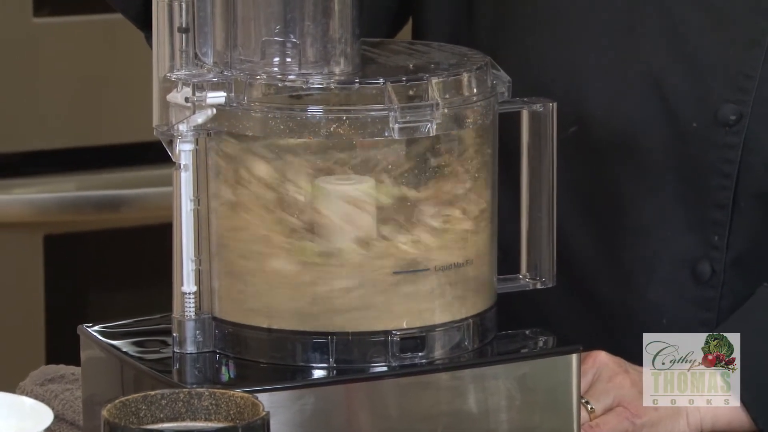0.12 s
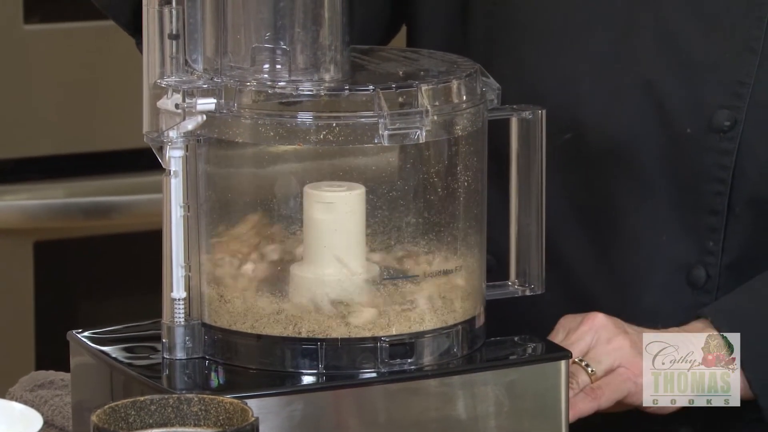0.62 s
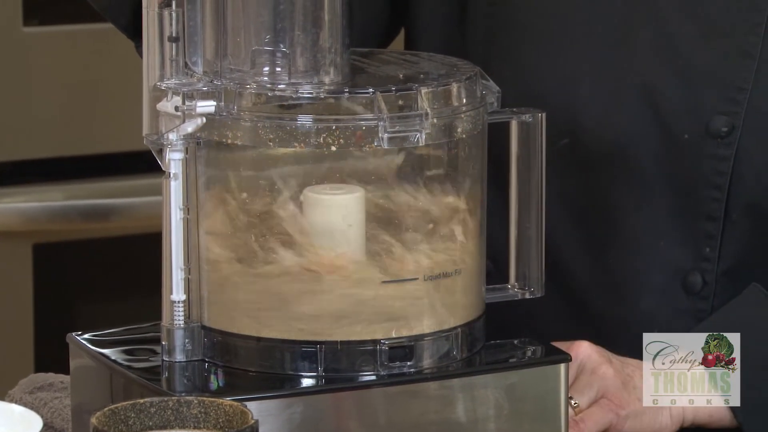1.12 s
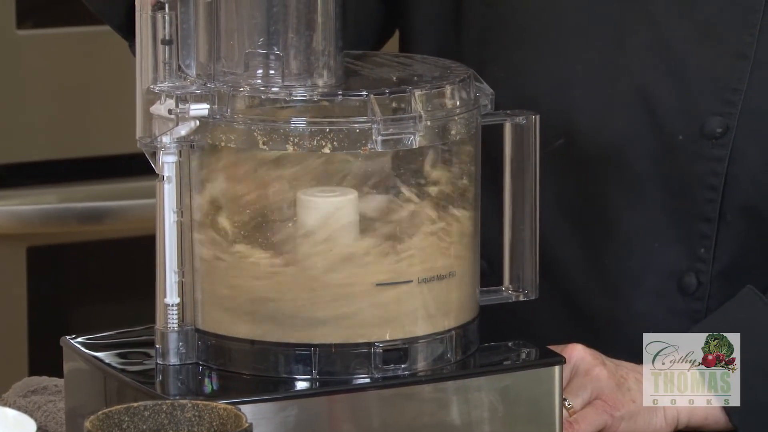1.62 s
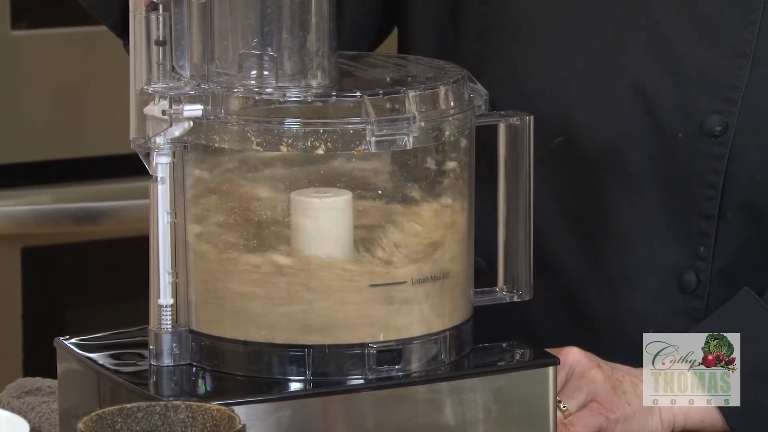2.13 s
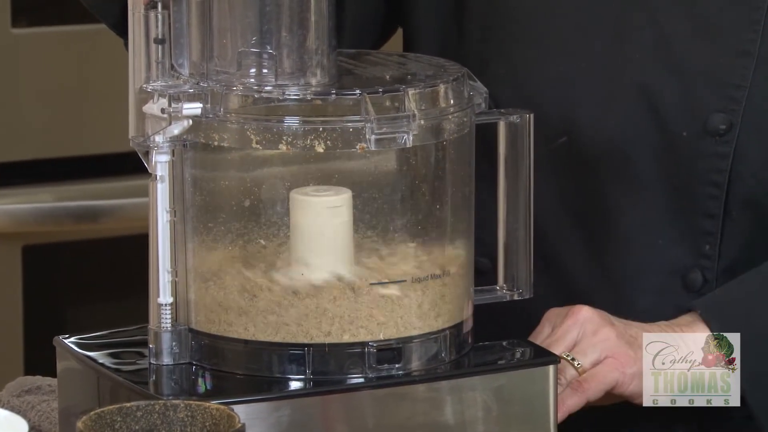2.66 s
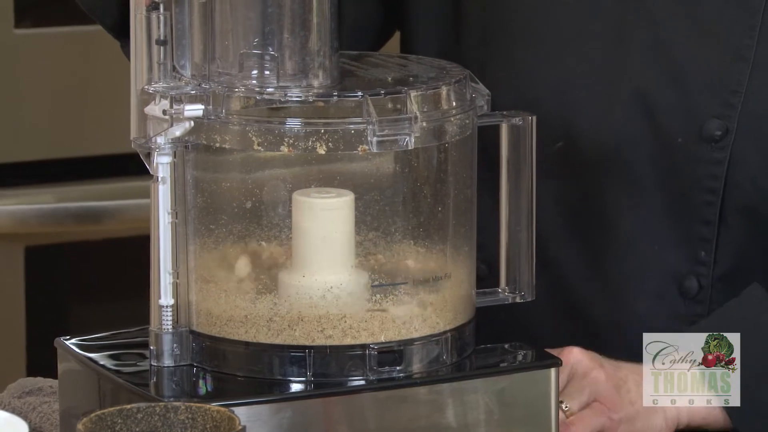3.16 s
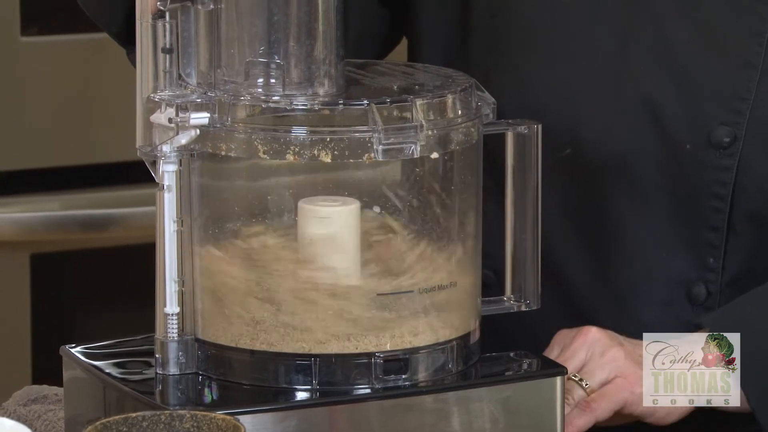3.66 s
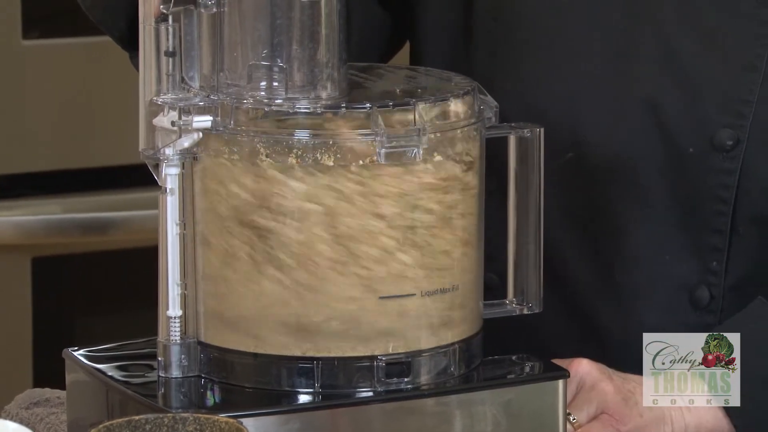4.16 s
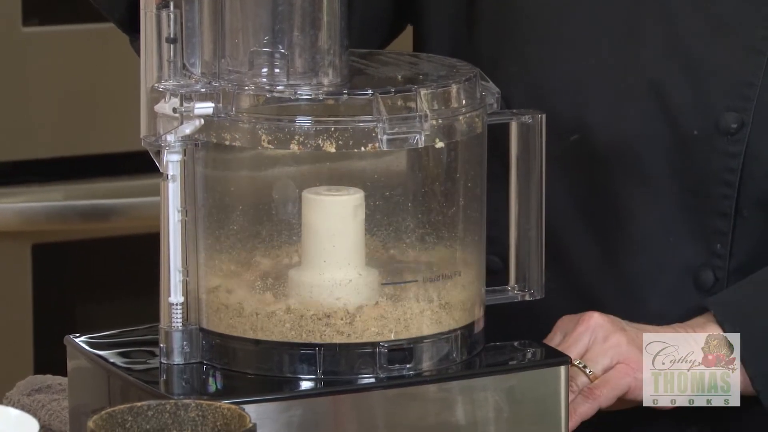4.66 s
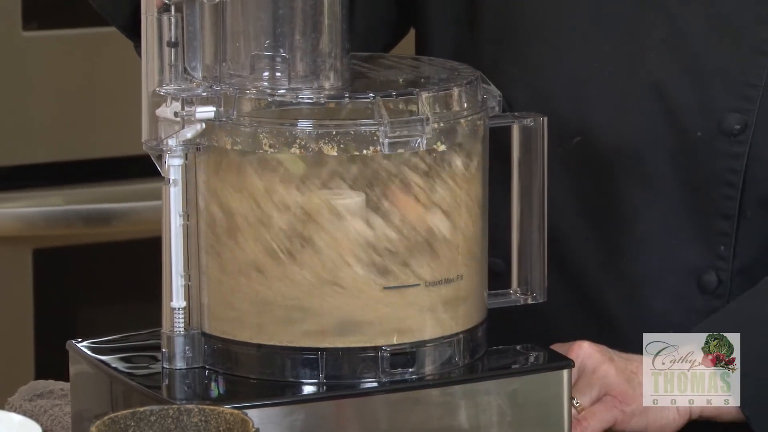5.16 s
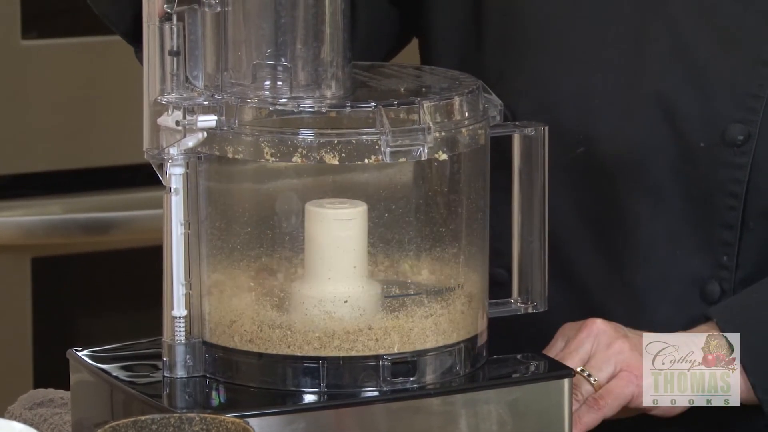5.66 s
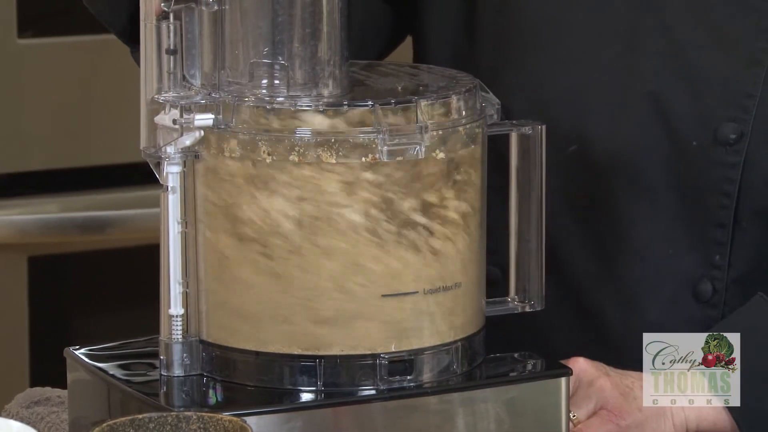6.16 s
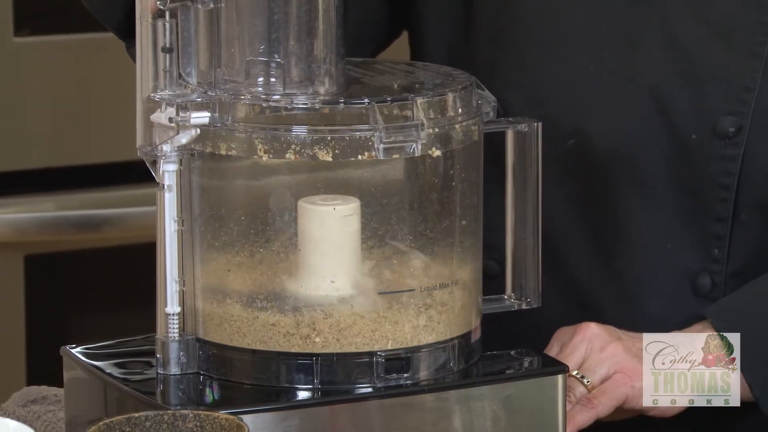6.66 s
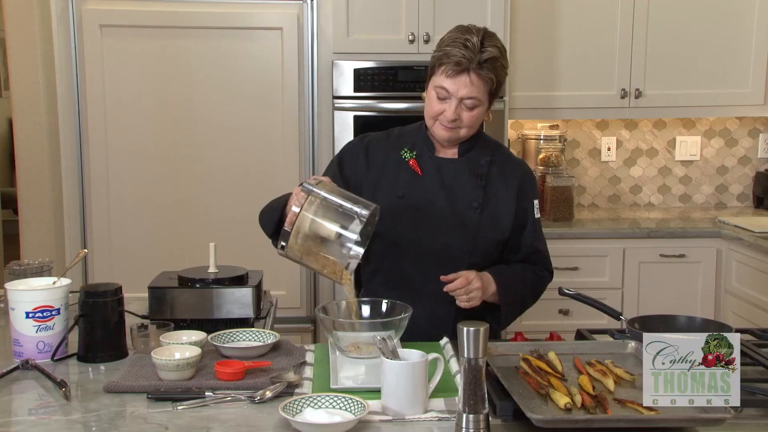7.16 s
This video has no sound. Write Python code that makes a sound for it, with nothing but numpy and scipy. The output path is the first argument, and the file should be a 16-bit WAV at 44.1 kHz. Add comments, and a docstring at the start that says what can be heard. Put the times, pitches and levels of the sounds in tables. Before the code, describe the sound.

Nuts clatter and crackle around a plastic processor bowl in one long and several short bursts, before being tipped into ringing glass.

```python
"""A small kitchen, one microphone. A food processor pulses six times: lever taps and contact snaps come
ahead of later pulses, then the blade flings nut pieces against the plastic bowl (a random hail of rings
and cracks) over an induction motor's hum (narrow noise), and each burst coasts down to a few last knocks.
At the end chopped nuts are tipped into a glass bowl that rings high (decaying, beating sines).
Quiet room air (coloured noise) lies under it all, and sparse echoes answer the bowls."""
import sys
import numpy as np
from scipy import signal
from scipy.fft import rfft, irfft, next_fast_len
from scipy.io import wavfile
from scipy.ndimage import uniform_filter1d

SR = 44100
rng = np.random.default_rng(int(sys.argv[2]) if len(sys.argv) > 2 else 0)


def gain_from_decibels(decibels):
    """Convert decibel values to linear amplitude factors."""
    exponent = np.asarray(decibels, float) / 20
    return 10 ** exponent


def wav_out(sig):
    """Save sig, one row per channel (or a flat mono array), as 16-bit PCM at SR to the path in sys.argv[1]."""
    wavfile.write(sys.argv[1], SR, np.round(np.clip(np.atleast_2d(sig).T, -1, 1) * 32767).astype(np.int16))


N = 321923
T = np.arange(N) / SR
BLOW_T = np.arange(2048) / SR  # time within one blow
SHAFT_HZ, PIECES_PER_S = 30.24, 5000  # the piece rate is for the full swirl
LOAD, HUM_LOAD, CRACKLE_LOAD = 2, 3, 4  # columns of the pulse table
# rise from contact to the kick: rattle_s, drumming_s, crackle_s, boom_s, hum_s
RISES_S = (.065, .056, .068, .03, .035)


def evened(x):
    """Scales to rms 1."""
    return x / np.sqrt(np.mean(x ** 2) + 1e-20)


def read(points, hz):
    """Reads a spectrum table on a log-frequency axis."""
    f, value = np.transpose(points)
    return np.interp(np.log(hz + 1), np.log(f + 1), value)


def coloured(x, points):
    """Filters the last axis by a spectrum table."""
    hz = np.fft.rfftfreq(x.shape[-1], 1 / SR)
    return irfft(rfft(x) * gain_from_decibels(read(points, hz)), x.shape[-1])


def add(mix, s, sound):
    """Lays a sound into the mix at a time."""
    part = mix[round(s * SR):][:len(sound)]
    part += sound[:len(part)]


def effort(layer, rise_s, column):
    """Level in dB of one layer: a kick throws the pile up, a lull while it hangs, full swirl, coast-down."""
    # pushes of the pulse lever: contact_s, release_s, load_db, hum_db, crackle_db,
    # coasting time as a share of the usual
    pulses = [(-.005, 0.396, -1, -8, -1, 1.11), (0.893, 2.494, 0, -4.5, 0.2, 0.94),
              (3.202, 3.584, 0.5, -3, 0, 1.14), (4.042, 4.395, 2, 2, 2, 0.89),
              (4.985, 5.368, 0.17, 1.5, 2.5, 0.92), (6.029, 6.451, 0.5, 2, 0.5, 0.94)]
    # the pile tumbles onto the blade (swell) or hangs on the wall (dip):
    # centre_s, half_length_s, change_db before the layer's share
    pile_surges = [(.001, 0.034, 10.5), (0.074, .02, 2), (0.213, .025, -0.5), (0.401, 0.0071, -5.5),
                   (0.621, 0.08, 5), (0.975, 0.013, 1), (1.116, 0.014, 3.5), (1.157, 0.015, 2.5),
                   (1.259, 0.023, -5.5), (1.294, .014, 0.5), (1.342, 0.022, -7.5), (1.464, .02, -3),
                   (1.631, 0.047, -5.5), (1.754, 0.055, -1.5), (2.106, 0.03, 2.5), (2.183, 0.037, -3.5),
                   (2.403, 0.014, 1.5), (2.499, 0.0059, 3), (4.033, 0.017, -11.5), (4.095, 0.031, -2),
                   (4.278, 0.019, 2), (4.675, 0.055, 3.5), (5.14, 0.058, 2.5), (5.243, 0.015, 1.5),
                   (5.712, 0.042, 5), (6.324, 0.024, 1.5), (6.445, 0.012, 2.5)]
    wake_s, drop_s = .052, .02  # the lever shakes the machine before contact; the drive lets go
    kick_end_s, lull_s, lull_end_s, full_s = .082, .112, .19, .29  # after contact
    full, wake, contact, kick, lull, drop, coast, brake, share = layer
    surges = share * sum(db * np.exp(-((T - s) / half) ** 2) for s, half, db in pile_surges)
    level = np.full(N, -120.)
    for pulse in pulses:
        since = T - pulse[0]
        start = np.interp(since, [-wake_s, 0, rise_s, kick_end_s, lull_s, lull_end_s, full_s],
                          [wake, contact, kick, kick, lull, lull, 0])
        after = np.maximum(T - pulse[1], 0) / pulse[-1]
        fade = drop * (1 - np.exp(-after / drop_s)) - coast * after - brake * after ** 2
        pulse_level = full + pulse[column] + start + fade
        level = np.where(since > -wake_s, np.maximum(level, pulse_level), level)
    return level + surges


def rings(modes, damping, detune, count):
    """One ring for each spot struck: every mode a little detuned, louder or softer, dying with its width."""
    hz, width, db = np.transpose(modes)
    t = BLOW_T[:, None]
    pitch, loudness, sign = rng.standard_normal((count, 1, len(hz), 3)).transpose(3, 0, 1, 2)
    share = gain_from_decibels(4 * loudness)
    share = share / np.sqrt((share ** 2).mean(0))
    size = gain_from_decibels(db) * share * np.sqrt(width) * np.sign(sign)  # wide modes die sooner, so start stronger
    decay = np.exp(-np.pi * damping * width * t)
    waves = size * decay * np.sin(2 * np.pi * hz * (1 + detune * pitch) * t)
    return waves.sum(2)


def blows(count=24):
    """One piece at each spot of the bowl: wall ring, drum ring, a short crack and the housing boom."""
    # three mode tables, each: pitch_hz, width_hz before damping, relative level_db
    bowl_bottom = [(640, 360, -16), (695, 58, 1.5), (749, 34, 2.5), (907, 74, -1.5)]
    plastic_walls_and_lid = [(1128, 110, -0.5), (1266, 78, -6.5), (1904, 60, 2.5), (2200, 190, 3.5),
                             (2506, 90, 2), (3010, 200, -2), (3056, 85, 5), (3430, 57, -3.5),
                             (4100, 520, -1.5)]
    housing_under_bowl = [(364, 23.4, -3.5), (379, 16.2, 4), (431, 39, -9), (475.6, 30, -3)]
    # spectrum of the crack: frequency_hz, relative level_db per Hz
    crack_spectrum = [(530, -50), (900, -11.5), (1270, -2.5), (1380, -6), (2500, -1.5), (2760, -4.5),
                      (6460, -17), (10100, -14.5), (15200, -23), (16500, -28.5)]
    burst = rng.standard_normal((count, 2048)) * np.exp(-BLOW_T / 0.0019)
    crack = evened(coloured(np.roll(burst, 64, axis=1), crack_spectrum))
    low = signal.butter(4, 6000, fs=SR, output="sos")
    high = signal.butter(4, 6000, "high", fs=SR, output="sos")
    floor = signal.butter(5, 310., "high", fs=SR, output="sos")  # a small housing radiates no bass
    walls = evened(rings(plastic_walls_and_lid, .9, 0.021, count))
    walls = walls + gain_from_decibels(2.5) * signal.sosfilt(low, crack)
    drum = rings(bowl_bottom, 1.59, 0.032, count)
    boom = rings(housing_under_bowl, 1.59, 0.032, count)
    kinds = [signal.sosfilt(floor, walls), signal.sosfilt(floor, drum),
             signal.sosfilt(high, crack), signal.sosfilt(floor, boom)]
    return [evened(kind) for kind in kinds]


def swirl(kinds):
    """A hail of pieces, bunched by the two blade arms; it thins out as the blade coasts."""
    # effort of each layer: full_db; against it wake_db, contact_db, kick_db, lull_db, release_db;
    # coast in dB/s, braking in dB/s2, share of the surges
    rattle = (-22., -29, -16.5, 3.5, -8, -6, 41.5, 117, 1.64)
    drumming = (-31., -17, -11, 11, -3.5, -1.3, 26.5, 86, 0.92)
    crackle = (-29, -42.5, -15, 1, -7.5, -12.5, 53, 101, 1.4)
    boom = (-26.5, -19.5, -6.5, -1, -8.5, -.6, 54, 71.5, 1.38)
    layers = rattle, drumming, crackle, boom
    columns = LOAD, LOAD, CRACKLE_LOAD, LOAD
    levels = [effort(*row) for row in zip(layers, RISES_S, columns)]
    speed = np.clip(gain_from_decibels(0.72 * (levels[0] + 23)), .03, 1)  # taken from the rattle level
    arms = 1 + 0.085 * np.cos(2 * np.pi * 2 * SHAFT_HZ * T)
    slow_noise = uniform_filter1d(uniform_filter1d(rng.standard_normal(N), 350), 350)
    clumps = gain_from_decibels(1.12 * evened(slow_noise))
    rate = PIECES_PER_S * speed
    # a sparser hail has a wider spread of sizes
    piece_db = (3.5 + 0.28 * (1 - speed)) * np.minimum(rng.exponential(1, N), 5)
    hits = (rng.random(N) < rate / SR) * gain_from_decibels(piece_db)
    hits *= arms * clumps / np.sqrt(rate)
    # each hit lands on a random spot; each spot's train of hits is convolved with its own blow
    spots = len(kinds[0])
    spot = rng.integers(0, spots, N)
    size = next_fast_len(N + 2048)
    trains = rfft(hits * (spot == np.arange(spots)[:, None]), size)
    sounds = (irfft((trains * rfft(kind, size)).sum(0), size)[:N] for kind in kinds)
    return sum(gain_from_decibels(level) * evened(sound) for level, sound in zip(levels, sounds))


def knocks(kinds):
    """Large pieces and the lever strike the same bowl, each with a few quick rebounds."""
    # single knocks of large pieces: time_s, wall_db, then drum_db and crackle_db against the wall
    large_pieces = [(.0885, -9, -15, -5), (.1835, -9, -15, -3.5), (.288, -11, -13, -11.5),
                    (.4015, -7, -15, -6.5), (0.684, -12, 0.5, -44), (0.6964, -8.5, -15, -44),
                    (0.8041, -16, -6, -31), (0.924, -17, -19, -8), (.941, -6, -5.5, -10),
                    (1.2324, -2, -19.5, -25), (1.579, -12.5, -24, 1), (1.668, -9.5, -19, -5),
                    (1.7005, -10, -18, -8), (1.759, -7, -20.5, -11), (1.818, -7, -21, -11),
                    (2.176, -12.5, -22, -8), (2.8389, -35.5, 7.5, -24), (2.8767, -30, -12, -12),
                    (2.9347, -39, -5, -23), (3.018, -50.5, -19, 1), (3.395, -6, -33.5, -5),
                    (3.4156, -9.5, -18.5, -16), (3.681, -5.5, -32, -20), (3.8122, -10.5, -27.5, -23),
                    (3.8921, -37, 3, -14), (3.9574, -28.5, 0.5, -14), (4.1599, -15.5, -12.5, 6),
                    (4.272, -7, -4, -22), (4.577, -32, -3, -23), (4.6183, -20, -28.5, -30),
                    (5.5494, -30.5, 4, 4.5), (5.6275, -30.5, 3.5, -3), (6.1294, -14.5, -32, 3),
                    (6.4745, -16.5, 1.5, -20), (6.6648, -16, -25, -22), (6.9763, -27, -15, -23)]
    # the lever bottoms out with a dull tap: time_s, wall_db
    lever_taps = [(3.1463, -25), (4.0093, -26), (4.9317, -23), (5.9856, -22.5)]
    # its contacts snap: time_s, crackle_db
    contact_snaps = [(.874, -29), (0.8912, -13), (0.9078, -10.5), (3.185, -23), (3.203, -10.5),
                     (4.044, -12), (4.0584, -14), (4.968, -17), (4.9836, -10), (4.998, -9.5),
                     (6.021, -17.5), (6.035, -10), (6.0505, -18.5)]
    snap_wall_db = -4.5  # against the crackle
    taps = [(s, db, -12, -18) for s, db in lever_taps]
    snaps = [(s, db + snap_wall_db, -20, -snap_wall_db) for s, db in contact_snaps]
    damping = np.exp(-BLOW_T / .006)  # a large piece stays in touch and damps the wall
    out = np.zeros(N)
    for k, (s, wall_db, drum_db, crackle_db) in enumerate(large_pieces + taps + snaps):
        spot_blows = [kind[k % len(kind)] for kind in kinds[:3]]
        wall, drum, crack = (blow / abs(blow).max() for blow in spot_blows)
        rebounds = np.zeros(400)
        rebounds[rng.integers(20, 400, 6)] = 0.2 * rng.uniform(-0.091, 1, 6)
        rebounds[0] = 1
        strike = wall * damping + gain_from_decibels(drum_db) * drum + gain_from_decibels(crackle_db) * crack
        add(out, s - .001, gain_from_decibels(wall_db) * np.convolve(strike, rebounds))  # the crack starts 1.5 ms in
    return out


def motor():
    """Wavering hum lines of the induction motor: narrow noise around each frequency."""
    # twice the mains, fifth shaft order, counter: pitch_hz, width_hz, relative level_db
    hum_lines = [(119.5, 8, -3), (149.5, 8, 0), (172, 40, -2)]
    # effort of the hum: full_db; against it wake_db, contact_db, kick_db, lull_db, release_db;
    # coast in dB/s, braking in dB/s2, share of the surges
    humming = (-34.5, -32, -24., 3, -5.5, -6.5, 7, 89, .6)
    hz = np.fft.rfftfreq(N, 1 / SR)
    white = rfft(rng.standard_normal(N))
    hum = np.zeros(N)
    for f, width, db in hum_lines:
        line = irfft(white / (1 + (2 * (hz - f) / width) ** 2), N)
        hum += gain_from_decibels(db) * evened(line)
    return gain_from_decibels(effort(humming, RISES_S[-1], HUM_LOAD)) * evened(hum)


def glass():
    """Each nut rings the high modes of the glass bowl in a new mix; crumbs patter in between."""
    # nuts landing in the bowl: time_s, peak_db, lift_db of the modes above 9500 Hz
    nut_pings = [(6.984, -33, -7), (6.996, -26.5, -5), (7.0194, -32.5, -3), (7.0442, -25, -1),
                 (7.071, -31, 5), (7.0865, -14.5, -2), (7.1528, -25.5, -1), (7.174, -30, -2),
                 (7.2366, -19.5, 1), (7.25, -28, -1), (7.28, -33, -6)]
    # glass modes, mostly close pairs that beat: pitch_hz, level_db, t60_s
    glass_modes = [(1450, -34, .03), (1650, -36, .03), (5749, -3, .09), (5800, -7, .11), (5856, -13, .1),
                   (7795, -15, .14), (7962, -13, .14), (8705, -9, .14), (8839, 0, .11), (8952, -5, .11),
                   (9900, -11, .14), (10008, -5, .14), (10083, -10, .14), (11617, -10, .12),
                   (11763, -9, .12), (12645, -20, .1), (12790, -22, .1), (14594, -27, .1), (15671, -21, .1)]
    # slowest mode, kept singing without decay: pitch_hz, rms_db, start_s
    glass_bell = (517, -69, 7.0)
    hz, db, t60 = np.transpose(glass_modes)
    t = np.arange(SR // 3)[:, None] / SR
    rise = np.minimum(t[:, 0] / .0015, 1)
    grit_band = signal.butter(2, [4500., 12500.], "band", fs=SR, output="sos")
    grit_decay = np.exp(-t[:3000, 0] / 0.016)
    crumb_draws = zip(rng.uniform(6.99, 7.3, 60), rng.exponential(1, 60))
    crumbs = [(s, -47 + 4 * size, 1.5) for s, size in crumb_draws]
    out = np.zeros(N)
    for s, peak_db, bright_db in nut_pings + crumbs:
        mix_db, phase = rng.standard_normal((2, len(hz)))
        mode_db = db + bright_db * (hz > 9500) + 3 * mix_db
        ping = (gain_from_decibels(mode_db - 60 * t / t60) * np.sin(2 * np.pi * hz * t + phase)).sum(1)
        add(out, s, gain_from_decibels(peak_db) * ping / abs(ping).max() * rise)
        grit = signal.sosfilt(grit_band, rng.standard_normal(3000)) * grit_decay
        add(out, s, gain_from_decibels(peak_db - 23.5) * grit)  # crumbs scatter
    f, bell_db, start = glass_bell
    bell = np.sqrt(2) * np.sin(2 * np.pi * f * T) * np.clip((T - start) / 0.04, 0, 1)
    return out + gain_from_decibels(bell_db) * bell


def kitchen(x):
    """Sparse echoes of random sign, each band dying at its own speed."""
    # decay of the small kitchen: frequency_hz, t60_s
    room_decay = [(250, 0.36), (2000, 0.64), (10000, 0.53)]
    taps = np.zeros(SR // 2)
    at = np.arange(200, SR // 2 - 20, 20)
    taps[at + rng.integers(0, 20, len(at))] = rng.choice([-1., 1.], len(at))
    hz, t, z = signal.stft(taps, SR, nperseg=256)
    decay = gain_from_decibels(-60 * t / read(room_decay, hz)[:, None])
    tail = signal.istft(z * decay, SR, nperseg=256)[1]
    return signal.fftconvolve(x, tail / np.linalg.norm(tail))[:N]


def room_air():
    """Quiet air of the room: steady noise, strongest in the bass."""
    # spectrum of the air: frequency_hz, relative level_db per Hz
    air_spectrum = [(35, -24.5), (80, 1.5), (100, 5), (135, -2), (283, -6), (384, -6), (573, -14.5),
                    (1690, -21), (1940, -25), (3420, -29.5), (7250, -25.5), (10300, -33), (13000, -41),
                    (16500, -58)]
    return gain_from_decibels(-56.5) * evened(coloured(rng.standard_normal(N), air_spectrum))


def scene():
    """Processor and glass close to the microphone, with kitchen echoes, over quiet room air."""
    kinds = blows()
    near = swirl(kinds) + knocks(kinds) + glass()
    room = gain_from_decibels(-10) * kitchen(near)
    return (near + room + motor() + room_air())[None]


def low_pass(x):
    """Removes everything above the highest recorded frequency."""
    return signal.sosfilt(signal.butter(12, 16850, fs=SR, output="sos"), x)


def record(dry):
    """Bass cut of the microphone, soft overload on the loudest cracks, then a band limit."""
    bass_cut = signal.butter(5, 88., "high", fs=SR, output="sos")
    band_limit = signal.ellip(8, .5, 40, 15900, fs=SR, output="sos")
    overloaded = 0.67 * np.tanh(signal.sosfilt(bass_cut, dry) / 0.68)
    return low_pass(signal.sosfilt(band_limit, overloaded))


dry = scene()
out = record(dry)
wav_out(out)
```